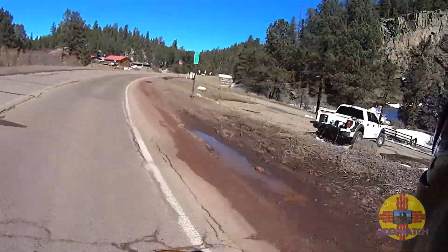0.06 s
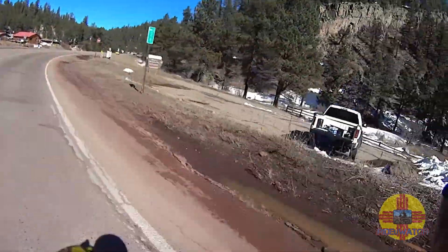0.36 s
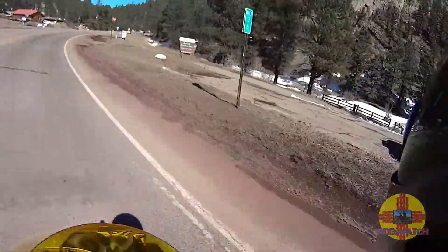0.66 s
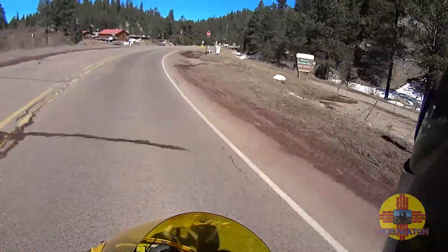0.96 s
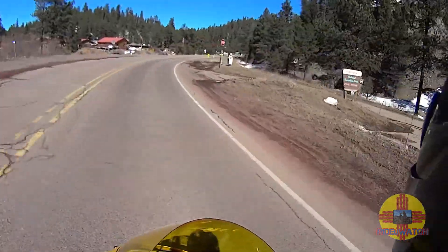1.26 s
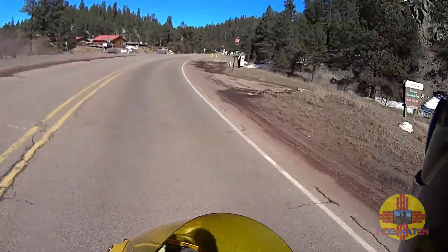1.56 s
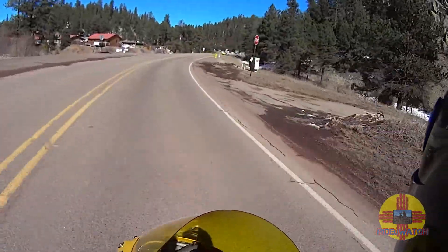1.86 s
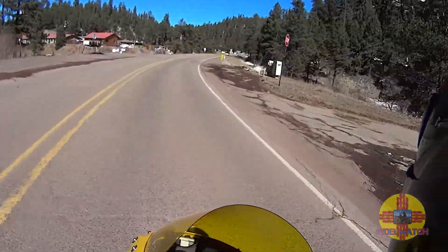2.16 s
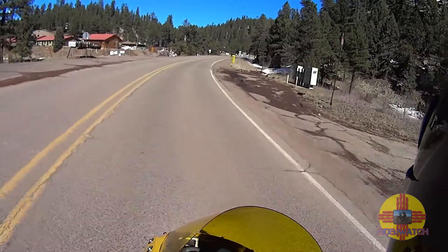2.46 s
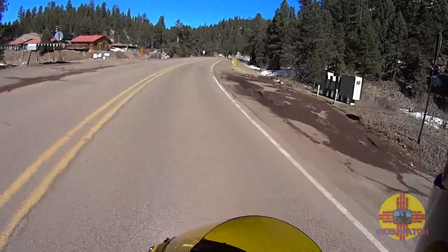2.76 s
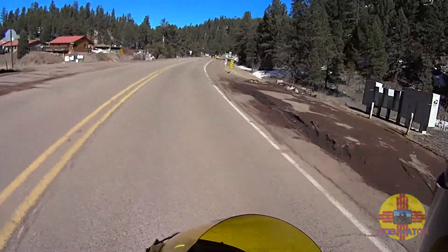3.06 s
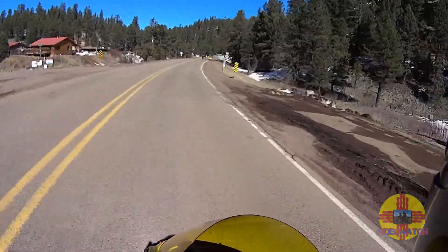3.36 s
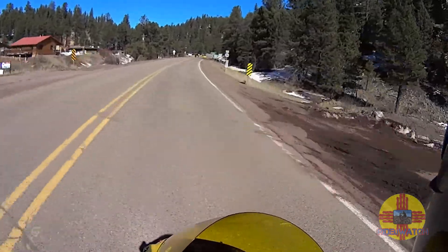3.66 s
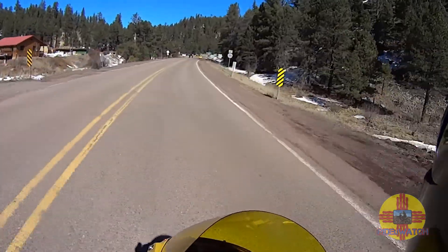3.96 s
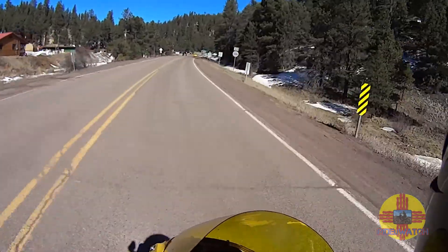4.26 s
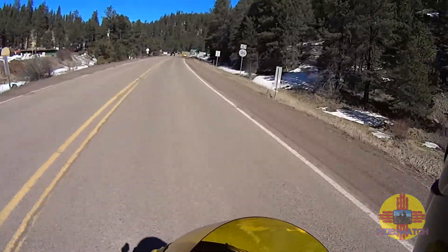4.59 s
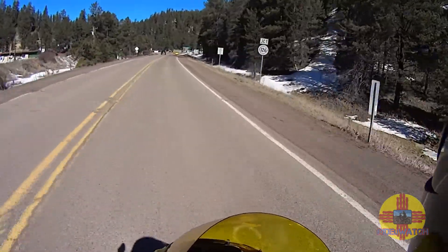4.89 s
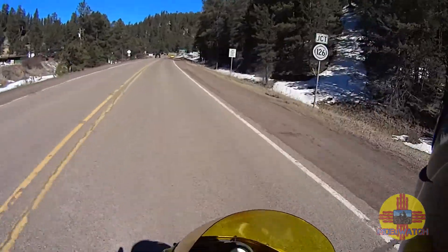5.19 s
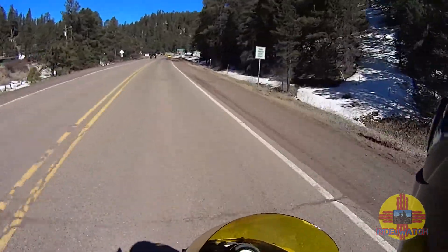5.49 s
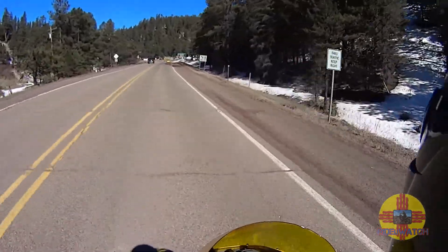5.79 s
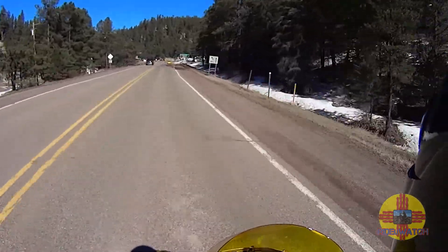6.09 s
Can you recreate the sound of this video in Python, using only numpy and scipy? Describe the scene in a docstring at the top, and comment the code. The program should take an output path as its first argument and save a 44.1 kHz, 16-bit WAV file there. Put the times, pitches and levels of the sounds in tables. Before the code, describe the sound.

A twin-cylinder motorcycle accelerates steadily, heard from on board, its pitch climbing until the throttle briefly shuts, with wind buffeting.

```python
"""Twin-cylinder motorcycle leaving a bend

Heard from the bike itself, the throttle opens in two steps, then shuts. Uneven firing pairs excite the
resonances of exhaust and airbox; gas rasps, valves clatter and the casing rings in step with them, at
levels set by engine speed and throttle. A gear whines, wind buffets and hisses, bumps knock the body."""
import sys
import numpy as np
from scipy import signal
from scipy.fft import rfft, irfft
from scipy.io import wavfile
from scipy.ndimage import uniform_filter1d

SR = 44100
rng = np.random.default_rng(int(sys.argv[2]) if len(sys.argv) > 2 else 0)


def materialize(psi):
    """Save the field psi as 16-bit PCM at rate SR to the path in sys.argv[1].

    A 1-D psi becomes a single channel; in a 2-D psi each row is a channel.
    """
    bounded = np.clip(np.atleast_2d(psi).T, -1, 1)
    quanta = np.round(bounded * 32767).astype(np.int16)
    wavfile.write(sys.argv[1], SR, quanta)


N = 275184
TIME = np.arange(N) / SR
SECOND_FIRING = 3 / 8  # 270 degrees into the 720-degree four-stroke cycle


def undb(db):
    """Decibels to amplitude ratio."""
    return 10 ** (np.asarray(db) / 20)


def unit(x):
    """Normalisation to rms 1."""
    return x / np.sqrt(np.mean(x ** 2))


def level_at(hz, spectrum):
    """Interpolation of (frequency [Hz], level [dB]) points on a logarithmic frequency axis."""
    f, db = np.transpose(spectrum)
    return np.interp(np.log(np.maximum(hz, 1)), np.log(f), db)


def colour(x, spectrum):
    """Zero-phase filtering by a spectral envelope, to rms 1."""
    hz = np.fft.rfftfreq(N, 1 / SR)
    return unit(irfft(rfft(x) * undb(level_at(hz, spectrum)) * (hz > 10), N))


def noise():
    """Gaussian white noise."""
    return rng.standard_normal(N)


def jitter(rate_hz):
    """Smoothed sample-and-hold noise, rms 1."""
    hold = int(SR / rate_hz)
    steps = np.repeat(noise()[:N // hold + 1], hold)
    return unit(uniform_filter1d(uniform_filter1d(steps, hold), hold)[:N])


def cyclic_noise(cycles, repeat, size=512):
    """Noise with a periodic part, as the same parts move in the same order every cycle."""
    pattern = np.interp(cycles % 1, np.arange(size) / size, rng.standard_normal(size), period=1)
    return repeat * pattern + noise()


def minimum_phase(spectrum):
    """Causality fixes a resonator's phase from its magnitude; radians in steps of 1 Hz."""
    cepstrum = irfft(np.log(undb(level_at(np.arange(SR // 2 + 1), spectrum))))
    return rfft(2 * cepstrum[:SR // 2], SR).imag


def pulses(cycles, strokes, width):
    """Periodic Gaussian pulses, one for each (position [cycles], height)."""
    return sum(height * np.exp(-(((cycles - at + .5) % 1 - .5) / width) ** 2) for at, height in strokes)


def swells(table):
    return sum(height * np.exp(-((TIME - at) / width) ** 2) for at, height, width in table)


def surges(table):
    """Gaussian amplitude envelopes with their peaks given in dB."""
    return swells([(at, undb(db), width) for at, db, width in table])


def throttle_opening():
    """Each twist of the grip is a linear ramp; their sum runs from 0 (shut) to 1 (wide open)."""
    # twists of the grip: (time [s], change of opening [-1..1], duration [s])
    twists = [(1.849, .49, .11), (2.694, 0.6, 0.17), (5.525, -.99, .09)]
    opening = sum(change * np.clip((TIME - at) / length, 0, 1) for at, change, length in twists)
    return np.clip(opening, 0, 1)


def drive_gain(hz, throttle, base_db, doubling_db, open_db, cruise_hz=27.3):
    """Amplitude follows a power law of engine speed, shifted in level by the throttle."""
    return undb(base_db + doubling_db * np.log2(hz / cruise_hz) + open_db * throttle)


def lull_db(at_s=5.65, depth_db=-14, half_width_s=0.072):
    """A Gaussian dip in level: the engine falls quiet just after the throttle shuts."""
    return swells([(at_s, depth_db, half_width_s)])


def exhaust_boom(hz, cycles, throttle, cam_hz=40.75, cam_width_hz=0.13, orders=26):
    """Source and filter: harmonics of two interfering firings drive the exhaust and airbox resonances."""
    # pipe response: (frequency [Hz], level shut [dB], level half open [dB], level wide open [dB])
    pipes = [(30.2, -42.5, -42.5, -26), (63.4, -40, -28.5, -21.5), (80.6, -28, -25.5, -20.5),
             (140, -20.5, -24, -19.5), (162.7, -24, -20.5, -16), (186.8, -33.5, -47, -27.5),
             (215.3, -56, -31, -18), (254.7, -52.5, -31, -20), (288.3, -53.5, -42.5, -31.5),
             (335.5, -46, -50.5, -44), (383.6, -54.5, -48.5, -49.5), (566, -75.5, -77, -62.5),
             (607, -73, -50.5, -54), (860, -76.5, -72.5, -68.5)]
    # stressed and muted harmonics: (order [multiple of the cycle rate], gain [dB])
    accents = [(9, 4), (10, 3.5), (11, 2), (12, 5.5), (13, 3.5), (14, -1), (15, -2), (16, 1.5), (17, -12.5),
               (18, 5.5), (19, 1.5), (20, -9.5), (21, -6.5), (22, 3.5)]
    shut, half, wide = (np.array(pipes)[:, [0, k]] for k in (1, 2, 3))
    pipe_phase = minimum_phase(wide)
    to_half, to_wide = np.minimum(2 * throttle, 1), np.maximum(2 * throttle - 1, 0)
    # on the cam the loaded engine breathes freely: the boom swells and the middle orders bark
    on_cam = throttle * (1 + np.tanh((hz - cam_hz) / cam_width_hz)) / 2
    bark_db = -1.5 + 3.5 * throttle + 7 * on_cam
    boom, power = 0, 0
    for k in range(1, orders + 1):
        f = k * hz
        # the pair favours orders 3, 5 and 8 and nearly cancels 4; higher up the two pulses differ
        pair = 1 + 0.98 / (1 + (f / 900) ** 2) * np.exp(-2j * np.pi * k * SECOND_FIRING)
        db = (1 - to_half) * level_at(f, shut) + (to_half - to_wide) * level_at(f, half)
        db += to_wide * level_at(f, wide)
        db += np.interp(k, *np.transpose(accents), left=0)
        db += bark_db * np.interp(f / 340, [.95, 1.08, 1.7, 2.2], [0.062, 0.83, 1, 0.43])
        amplitude = abs(pair) * undb(db)
        # the silencer's chambers delay the higher orders and smear each bang
        dispersion = (np.maximum(f - 420, 0) / 85) ** 2
        phase = np.angle(pair) + np.interp(f, np.arange(len(pipe_phase)), pipe_phase) - dispersion
        # combustion varies from cycle to cycle, most in the high orders
        scatter = undb((0.28 + k / orders) * jitter(21.95))
        boom -= amplitude * scatter * np.cos(2 * np.pi * k * cycles + phase)
        power += amplitude ** 2 / 2
    gain = drive_gain(hz, throttle, base_db=-15.5, doubling_db=-4.5, open_db=1.53)
    return boom / np.sqrt(power) * gain * undb(0.93 * on_cam + lull_db())


def gas_rasp(hz, cycles, throttle):
    """Pulsating flow: gas rasps through the ports at each stroke, in harder puffs under load."""
    # flow noise spectrum: (frequency [Hz], relative level [dB])
    spectrum = [(250, -17.5), (400, 2), (620, 1.5), (800, 1.5), (1100, -1), (1350, -2.5), (1600, -13),
                (2500, -24.5), (5000, -41.5)]
    puffs = pulses(cycles, [(0, .9), (SECOND_FIRING, 1), (2 * SECOND_FIRING, .7)], width=0.049)
    flow = cyclic_noise(cycles, repeat=.25)
    envelope = 0.76 + puffs * (0.46 + 0.5 * throttle) * undb(2.2 * jitter(70))
    gain = drive_gain(hz, throttle, base_db=-50.5, doubling_db=1.6, open_db=-.8)
    return colour(flow * envelope, spectrum) * gain


def valve_clatter(hz, cycles, throttle, rattle_hz=40.5, rattle_width_hz=4.0):
    """Impact noise: combustion and valve gear rattle the casing, hardest under load near one speed."""
    # clatter spectrum: (frequency [Hz], relative level [dB])
    spectrum = [(900, -22.5), (1500, 1.5), (1850, 5.5), (1960, 5), (2080, 3.5), (2300, -3.5), (2700, -21.5),
                (3300, -4), (3750, -19), (4200, -24), (5200, -21.5), (9000, -35)]
    strikes = pulses(cycles, [(0, .75), (SECOND_FIRING, 1), (2 * SECOND_FIRING, .45)], width=0.056)
    impacts = cyclic_noise(cycles, repeat=0.13) * (0.7 + strikes * undb(2 * jitter(90)))
    rattle_db = 8 * throttle * np.exp(-((hz - rattle_hz) / rattle_width_hz) ** 2)
    gain = drive_gain(hz, throttle, base_db=-61, doubling_db=1.5, open_db=2.5)
    return colour(impacts, spectrum) * gain * undb(rattle_db)


def gear_whine(hz, cycles, mesh_order=188, wobble=.011):
    """Forced resonance: a ragged, throbbing mesh tone is loud only while it crosses a gearbox mode."""
    # gearbox modes: (frequency [Hz], bandwidth [Hz], level [dB])
    modes = [(5100, 170, -65), (5605, 230, -57)]
    mesh_hz = mesh_order * hz
    mesh_cycles = np.cumsum(mesh_hz * (1 + wobble * jitter(600))) / SR
    throb = 1 + .5 * np.cos(2 * np.pi * cycles)
    gain = sum(undb(db) / (1 + (2 * (mesh_hz - f) / width) ** 2) for f, width, db in modes)
    return gain * unit(np.sin(2 * np.pi * mesh_cycles) * throb * undb(3 * jitter(60)))


def modal_response(cycles, modes):
    """Narrow resonances filter noise that pulses at each firing; rms 1."""
    hz = np.fft.rfftfreq(N, 1 / SR)
    response = sum(undb(db) / (1 + 2j * (hz - f) / width) ** 2 for f, width, db in modes)
    blows = noise() * (0.65 + pulses(cycles, [(0, .7), (SECOND_FIRING, 1)], width=0.036))
    return unit(irfft(rfft(blows) * response, N))


def casing_ring(hz, cycles, throttle):
    """Modal vibration: the firings keep the metal casing ringing; load brings out its lowest mode."""
    # casing modes: (frequency [Hz], bandwidth [Hz], relative level [dB])
    modes = [(2075, 110, 0), (3820, 200, -2), (4640, 140, -4)]
    gain = drive_gain(hz, throttle, base_db=-64, doubling_db=1.3, open_db=1.2)
    ring = modal_response(cycles, modes) * gain
    return ring + modal_response(cycles, modes[:1]) * undb(-61.5) * throttle


def air_hiss(cycles, grain_db=1.2, flicker_db=.3):
    """Amplitude-modulated noise: air and tyre hiss pulses with the firings, grainy with tiny ticks."""
    # hiss spectrum: (frequency [Hz], relative level [dB])
    spectrum = [(500, -2.5), (1500, 0.5), (2400, 0.5), (2950, -1), (3500, -2.5), (3850, 2), (4080, -1.5),
                (4650, 0.5), (4880, 0), (5250, 1.5), (6000, -2.5), (6900, -7.5), (8800, -14.5),
                (10000, -27.5)]
    # passing rises of the hiss: (time [s], gain [dB], half width [s])
    rises = [(2.6, 2.5, 0.44), (4.1, 2, 0.62)]
    ticks = np.minimum(rng.exponential(size=N // 20 + 1), 6)
    grain = undb(grain_db * np.repeat(ticks, 20)[:N])
    pulsing = 1 + 0.44 * pulses(cycles, [(0, .5), (SECOND_FIRING, 1)], width=0.18)
    hiss = colour(noise() * grain * pulsing, spectrum) * undb(flicker_db * jitter(13))
    return hiss * undb(-53.5 + swells(rises) + 0.17 * lull_db())


def wind_buffet(hz, throttle):
    """Turbulent pressure fluctuations: eddies buffet the microphone, harder in gusts."""
    # eddy spectrum: (frequency [Hz], relative level [dB])
    spectrum = [(12, -2.5), (25, 1), (50, -2.5), (90, -2), (150, -6.5), (250, -15), (400, -27.5),
                (600, -36.5), (1200, -74.5)]
    # gusts: (time [s], peak level [dB], half width [s])
    gusts = [(.685, -20, 0.033), (1.4, -34.5, 0.29), (4.95, -30, 0.68), (5.69, -27, 0.0082),
             (6.22, -27, 0.25)]
    steady = drive_gain(hz, throttle, base_db=-27, doubling_db=4.1, open_db=-2.6)
    return colour(noise(), spectrum) * (steady + surges(gusts))


def air_rush():
    """Broadband flow noise: air sweeps past in brief rushes, brighter than the buffeting."""
    # rush spectrum: (frequency [Hz], relative level [dB])
    spectrum = [(200, 1), (450, 6), (900, 4), (1500, -10.5), (3000, -10.5), (8000, -37.5)]
    # rushes of air: (time [s], peak level [dB], half width [s])
    rushes = [(.43, -47, .2), (5.21, -42, 0.031), (5.97, -46.5, 0.088), (6.2, -45, 0.14)]
    return colour(noise(), spectrum) * surges(rushes)


def bodywork_knocks():
    """Damped vibration: each bump makes the bodywork clack and decay exponentially."""
    # bumps: (time [s], level [dB], decay time [s])
    bumps = [(.745, -47, .006), (.835, -43, .008), (1.239, -32, .005), (1.72, -45, .005), (3.95, -46, .012),
             (5.18, -41, .03), (5.215, -41, .025), (5.965, -45, .02)]
    # bodywork response: (frequency [Hz], relative level [dB])
    spectrum = [(200, 3), (600, 4), (1200, 0), (1900, 0), (2800, -6), (3600, -15), (5000, -23), (9000, -36)]
    envelope = sum(undb(db) * (TIME >= at) * np.exp(-abs(TIME - at) / decay) for at, db, decay in bumps)
    return envelope * colour(noise(), spectrum)


def scene():
    """Superposition of engine, wind and road at the rider's position."""
    # engine speed: (time [s], four-stroke cycle rate [Hz])
    speed = [(0.0, 27.2), (0.44, 27.6), (1.57, 29.08), (2.12, 30.6), (3.2, 34.4), (3.94, 37.67),
             (5.04, 42.61), (5.51, 44.1), (5.64, 43.63), (5.71, 41.64), (5.76, 41.65), (5.9, 43.1),
             (6.05, 43.37)]
    hz = np.interp(TIME, *np.transpose(speed))
    throttle = throttle_opening()
    cycles = np.cumsum(hz * (1 + 0.0013 * jitter(25))) / SR
    engine = exhaust_boom(hz, cycles, throttle) + gas_rasp(hz, cycles, throttle)
    engine += valve_clatter(hz, cycles, throttle) + gear_whine(hz, cycles)
    engine += casing_ring(hz, cycles, throttle)
    air = air_hiss(cycles) + wind_buffet(hz, throttle) + air_rush()
    return (engine + air + bodywork_knocks())[None]


def record(dry):
    """Band limiting: a steep elliptic low-pass filter removes the highest treble."""
    cutoff_hz = 9450
    return signal.sosfilt(signal.ellip(8, .2, 70, cutoff_hz, fs=SR, output="sos"), dry)


dry = scene()
out = record(dry)
materialize(out)
```